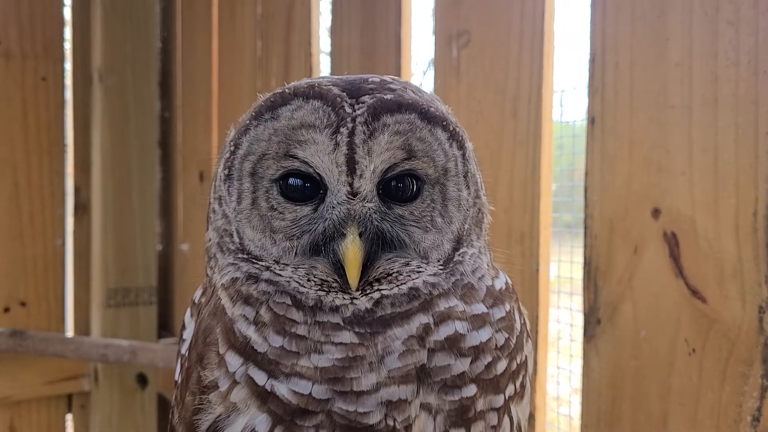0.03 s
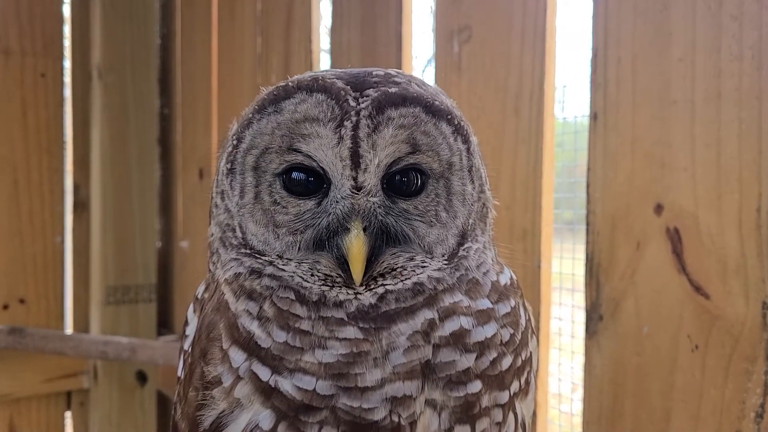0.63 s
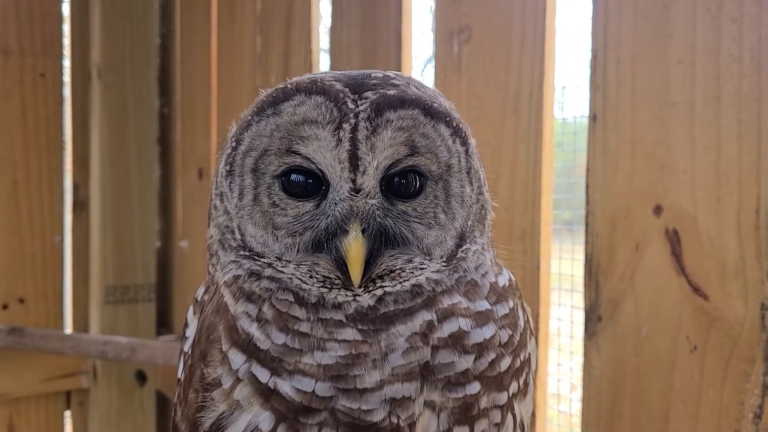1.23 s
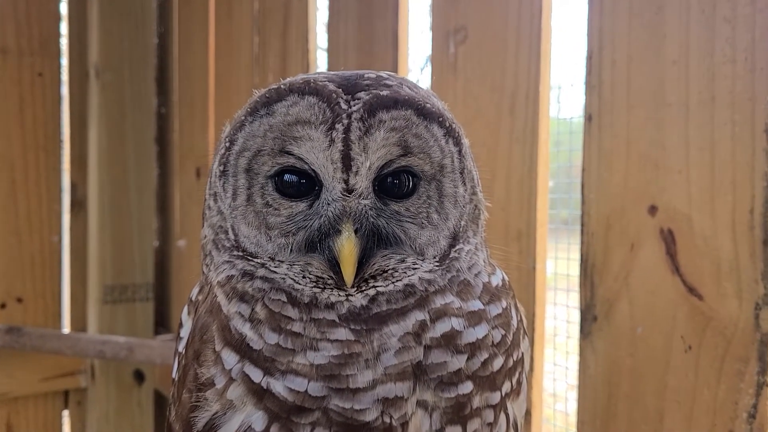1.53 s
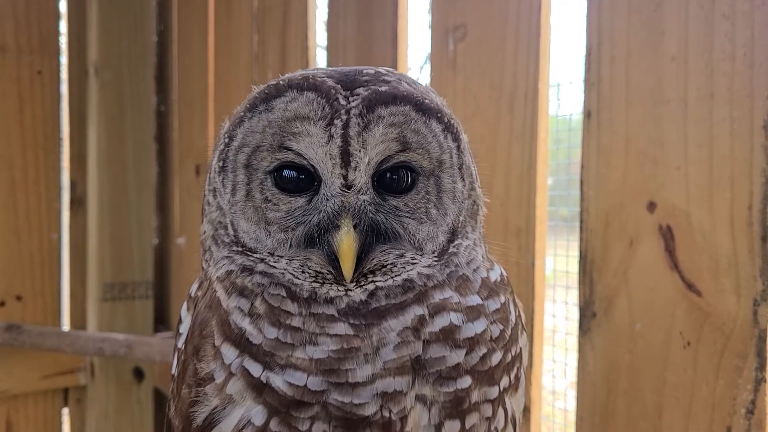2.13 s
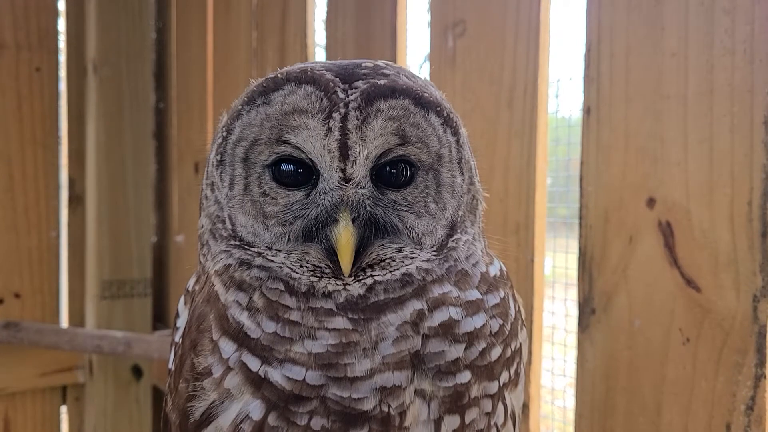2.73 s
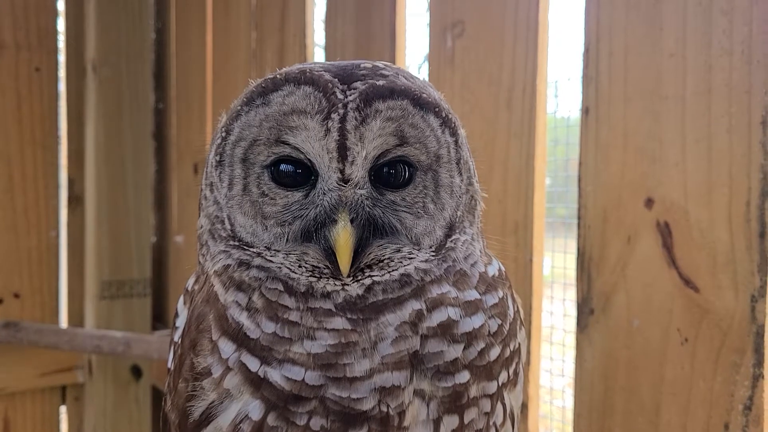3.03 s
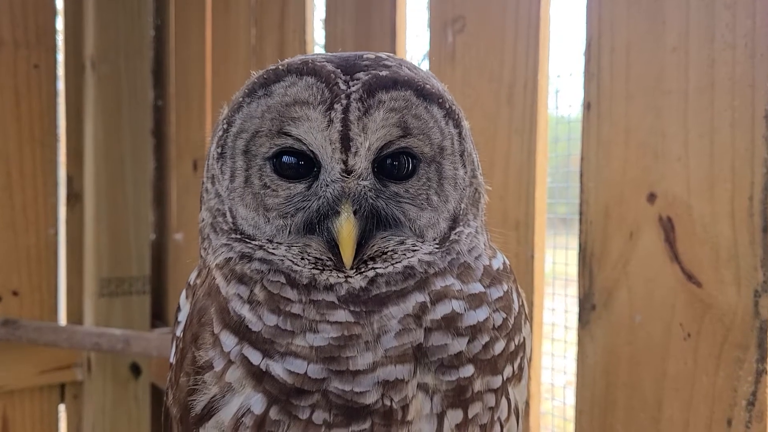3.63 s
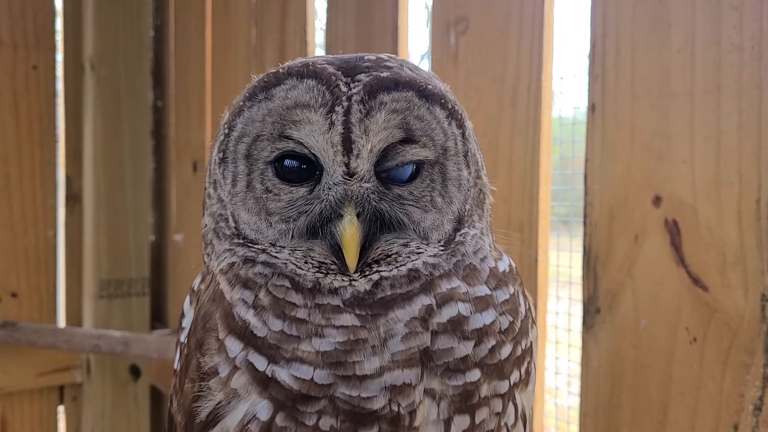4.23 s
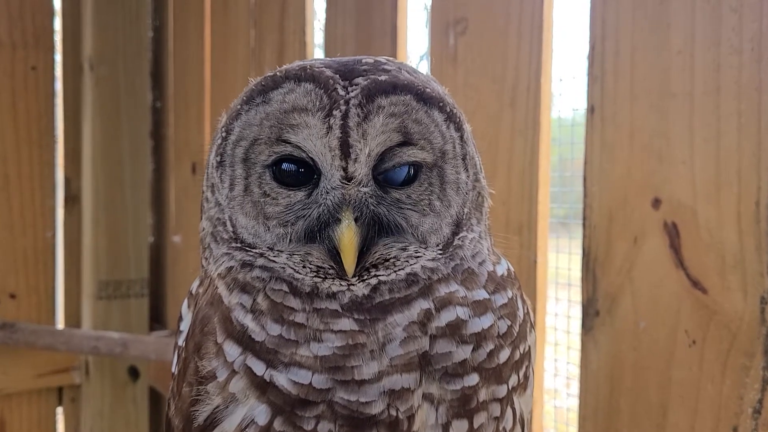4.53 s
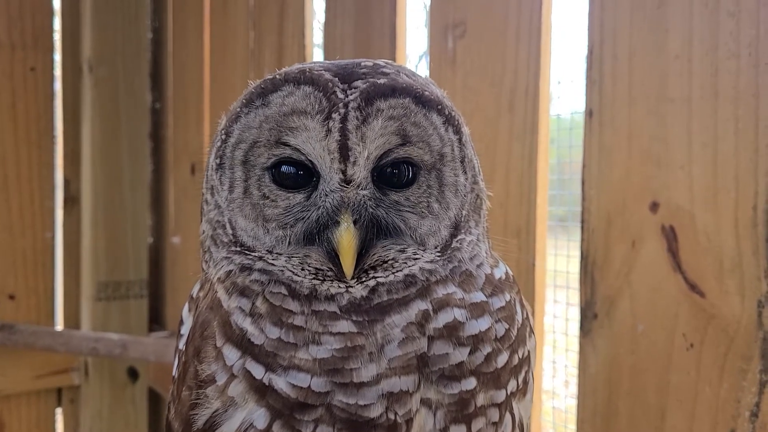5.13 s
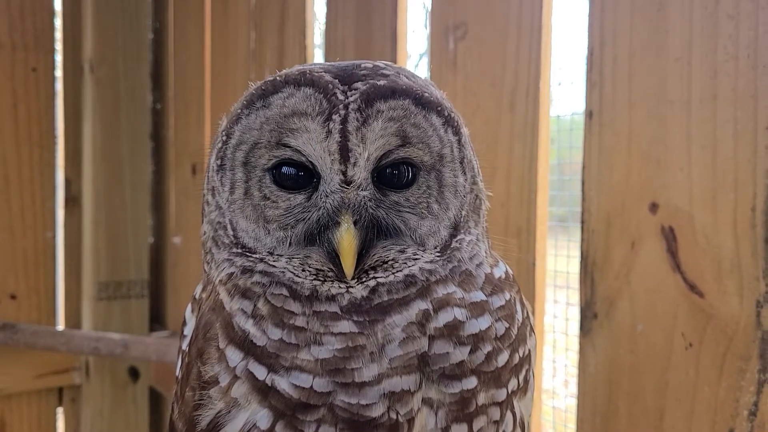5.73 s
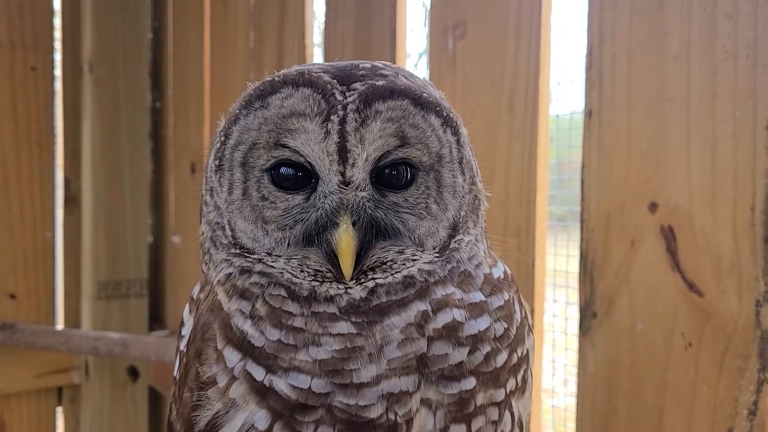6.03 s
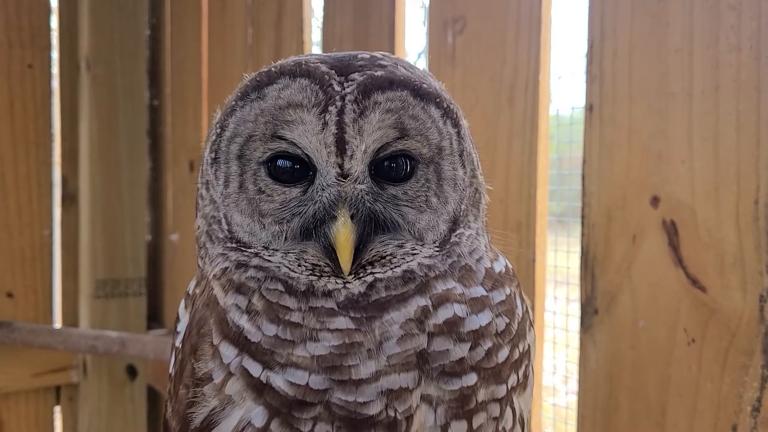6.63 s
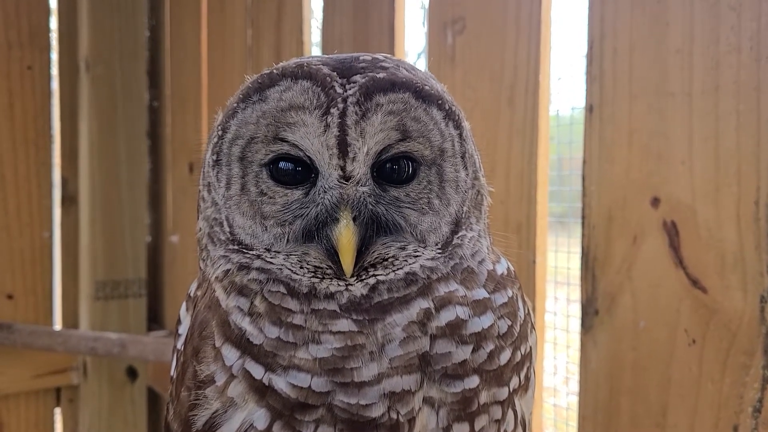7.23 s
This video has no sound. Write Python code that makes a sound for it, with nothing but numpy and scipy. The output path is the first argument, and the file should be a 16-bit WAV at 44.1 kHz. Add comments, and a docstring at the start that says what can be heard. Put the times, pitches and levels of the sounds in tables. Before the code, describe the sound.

A nearby owl makes a run of seven soft, very brief hoots, rising and then falling in pitch, inside a plank enclosure. Before them come a few light handling knocks on the microphone and a barely audible rooster in the distance. Occasional bumps continue during and after the hoots. Faint bird whistles and twittering come from outside, over a quiet, steady rumble of far traffic.

```python
"""An owl in a plank enclosure gives seven short, soft hoots that climb in pitch and sink again.
Its voice box makes a nearly pure tone with a thin buzz on top, and the boards add quick echoes.
A hand bumps, ticks and slips on a camera, mostly on the right. Small birds whistle and a rooster
crows far off, over the low rumble of distant traffic and a faint hiss."""
import sys
import numpy as np
from scipy import signal
from scipy.fft import rfft, irfft
from scipy.io import wavfile
from scipy.ndimage import map_coordinates

SR = 44100
rng = np.random.default_rng(int(sys.argv[2]) if len(sys.argv) > 2 else 0)


def master_out(mix):
    """Clip the mix to full scale and print it as 16-bit PCM to the path in sys.argv[1]."""
    frames = np.transpose(np.atleast_2d(mix))
    ceiling = np.clip(frames, -1, 1)
    pcm = np.round(ceiling * 32767).astype(np.int16)
    wavfile.write(sys.argv[1], SR, pcm)


N = 326340
TIME = np.arange(N) / SR
SIDES = np.array([[.5], [-.5]])   # splits a left-minus-right amount between the two sides


# The hoots, before their pitch sags: start_s, length_s, level_db, top_pitch_hz, top_time_s, end_pitch_hz
HOOTS = [(3.4508, 0.066, -32.5, 561.7, 0.029, 465.6), (3.746, 0.056, -31.5, 586, 0.02, 505),
         (4.0874, 0.06, -32, 626, .026, 490), (4.296, 0.067, -31.6, 690.4, 0.026, 514),
         (4.582, 0.059, -30.5, 707.7, 0.013, 493), (4.9477, 0.061, -31.5, 665.3, 0.018, 472),
         (5.48, 0.07, -32.5, 617.7, 0.029, 448)]
# How the throat colours the overtones (the tones above the main one): pitch_hz, gain_db
THROAT = [(1050, -19.5), (1400, -17), (1560, -36), (1800, -33.5), (2100, -57.5), (2800, -54), (3500, -36),
          (4200, -38.5), (4900, -31), (5600, -37), (6400, -50.5), (10000, -46), (11200, -60), (14000, -53),
          (16000, -68)]
# Which side the overtones lean to: pitch_hz, left_minus_right_db
OWL_BALANCE = [(600, -3.3), (1400, 1.3), (2500, -8), (3600, -18.5), (5000, -9.5), (6500, 4.5), (9000, 7),
               (14000, 9)]

def owl(jitter=.005, sag=.1, die_s=.0063, shimmer_db=3.5):
    """The voice box swings smoothly; it buzzes only while the breath pushes hardest."""
    out = np.zeros((2, N))
    for start, length, level_db, top_hz, top_s, end_hz in HOOTS:
        t, hz = arch(length, top_hz, top_s, end_hz, margin_s=.02)
        hz = hz * (1 - sag * (1 + np.tanh((t - length) / die_s)) / 2)   # pitch sags as the air runs out
        uneven_hz = hz * (1 + jitter * drift(300, len(t)))
        phase = 2 * np.pi * np.cumsum(uneven_hz) / SR
        pressure = swell(t, on_s=.0082, off_s=length - .0073, grow_s=.0045, die_s=die_s)
        buzz_db = -1.6 + 13 * np.log2(top_hz / 623)   # a higher hoot is pressed harder and buzzes more
        buzz = from_db(buzz_db) * swell(t, on_s=.012, off_s=length * .55, grow_s=.0062, die_s=.01)
        note = pressure * np.sin(phase) * np.ones((2, 1))
        for k in range(2, 26):
            strength = pressure ** 2 if k == 2 else buzz * from_db(shimmer_db * drift(80, len(t)))
            colour = from_db(at_hz(THROAT, k * hz) + SIDES * at_hz(OWL_BALANCE, k * hz))
            note += strength * colour * np.sin(k * phase)
        add(out, start + t[0], from_db(level_db) * note)
    return out


# Echoes from the boards, one table for each side: delay_ms, gain_db
LEFT_ECHOES = [(1.41, -11.5), (2.19, -20), (3.86, -17.5), (16.1, -20), (22.64, -15.5), (42.36, -23.5)]
RIGHT_ECHOES = [(2.43, -11.5), (7.1, -7.5), (11.56, -16), (17.53, -16), (29.7, -20.5), (38.44, -22)]

def enclosure(voice, tail_db=-24, absorb_hz=1100, right_lag_s=.00016):
    """A few hard echoes bounce off the planks, then a short tail leaks out through the gaps."""
    out = voice.copy()
    for side, echoes in enumerate((LEFT_ECHOES, RIGHT_ECHOES)):
        for delay_ms, gain_db in echoes:
            out[side] += from_db(gain_db) * np.roll(voice[side], round(delay_ms * SR / 1000))
    out[1] = np.roll(out[1], round(right_lag_s * SR))   # the right microphone is farther from the beak
    dull = filtered(voice, absorb_hz, "low", order=1)   # wood and litter soak up the overtones
    return out + from_db(tail_db) * scatter(dull, fade_s=.16, onset_s=.021)


# Touches on the camera body: time_s, level_db, ring_hz, half_width_s, thud_vs_ring_db
BUMPS = [(.161, -38, 330, 0.0016, -25), (0.5316, -52.5, 1000, 0.00029, -11),
         (0.9239, -41.5, 1100, .0002, -22), (0.9392, -33.5, 1150, 0.00086, -2.5),
         (.966, -44, 1280, 0.0002, -22), (0.9954, -45, 550, 0.00069, -20),
         (1.0643, -43.5, 5200, 0.00016, -40), (1.074, -51, 5370, .00015, -40),
         (1.105, -45, 4800, 0.00018, -40), (1.1395, -31, 500, 0.00033, -24),
         (2.356, -35.5, 1000, 0.001, -4), (3.862, -37.5, 320, 0.00066, -0.5),
         (3.8841, -44.5, 400, .0004, -6.5), (5.0586, -37, 700, 0.00052, -5.5),
         (7.0928, -34.5, 800, 0.00047, -19)]

def camera_bumps(thud_hz=270, thud_fade_s=.022, grit_db=-19, grit_fade_s=.068, left_db=-24):
    """Each touch rings for an instant, leaves a gritty edge and pushes the case into a low thud."""
    out = np.zeros(N)
    t = TIME[:SR // 16] - .006   # the touch lands at t = 0
    since_touch = np.maximum(t, 0)
    since_push = np.maximum(t - .0011, 0)   # the thud starts a moment later
    for time_s, level_db, ring_hz, width_s, thud_db in BUMPS:
        ring = 4 * swell(t, 0, 0, width_s, width_s) * np.cos(2 * np.pi * ring_hz * t)
        thud = from_db(thud_db - 60 * since_push / thud_fade_s) * np.sin(2 * np.pi * thud_hz * since_push)
        grit_gain = from_db(grit_db - 60 * since_touch / grit_fade_s) * (1 + np.tanh(t / width_s)) / 2
        grit = filtered(grit_gain * rng.standard_normal(len(t)), 2300, "low")
        add(out, time_s + t[0], from_db(level_db) * (ring + thud + grit))
    return filtered(out, 70, "high") * from_db([[left_db], [0]])


def finger_slip(start_s=3.874, length_s=.045, level_db=-70, grain_db=5, left_db=-8):
    """A fingertip slips briefly on the case: a clump of tiny grains of sound."""
    out, size = np.zeros(N), int(length_s * SR)
    grains = rng.standard_normal(size) * from_db(grain_db * drift(570, size))
    add(out, start_s, from_db(level_db) * rms_one(grains) * signal.windows.tukey(size, .5))
    return out * from_db([[left_db], [0]])


def chirp(length, start_hz, end_hz, warble):
    """One whistle bends away from its first pitch, with a fast wobble."""
    t, hz = arch(length, start_hz, 0, end_hz)
    hz = hz * (1 + warble * drift(450, len(t)))
    return signal.windows.tukey(len(t), .8) * np.sin(2 * np.pi * np.cumsum(hz) / SR)


def twitter(length, middle_hz, notes_per_s=36, note_s=.055, spread_octaves=.27, glide_octaves=.4):
    """A quick run of notes, each sliding up or down from a pitch of its own."""
    out = np.zeros(int((length + 2 * note_s) * SR))
    for k, (late, height, bend) in enumerate(rng.uniform(-.8, 1, (int(length * notes_per_s), 3))):
        start_hz = middle_hz * 2 ** (spread_octaves * height)
        end_hz = start_hz * 2 ** (glide_octaves * bend)
        add(out, (k + .5 + late / 2) / notes_per_s, chirp(note_s, start_hz, end_hz, warble=.05))
    return out


# Nearer bird calls, before distance softens them: start_s, length_s, level_db, start_hz, end_hz
CHIRPS = [(0.137, 0.039, -72, 6900, 8600), (0.835, 0.067, -65.5, 6900, 8100),
          (1.597, 0.016, -64, 10360, 8100), (1.613, 0.047, -55.5, 7660, 9040),
          (1.633, 0.067, -69, 3470, 4730), (1.716, 0.078, -73, 2880, 2480),
          (2.02, 0.075, -69.5, 2850, 3220), (2.115, 0.15, -72, 4200, 3830), (2.421, 0.11, -69, 2874, 2936),
          (3.3, 0.025, -66.5, 2500, 2450), (3.5, .1, -71.5, 1770, 1684), (3.661, 0.04, -71.5, 2700, 2620),
          (5.484, 0.073, -65.5, 3610, 4100), (6.338, .05, -65, 7900, 6750),
          (6.35, 0.056, -58.5, 3367, 3660), (6.754, 0.057, -75, 6800, 5240),
          (7.241, 0.074, -67.5, 5370, 6270), (7.309, .047, -64, 4710, 3280)]
# Bursts of twittering farther off: start_s, length_s, level_db, middle_pitch_hz
TWITTERS = [(1.407, .07, -77.5, 3430), (1.993, 0.27, -76, 3600), (2.55, 0.18, -81.5, 3595),
            (2.839, .22, -78.5, 3650), (3.28, 0.32, -77, 3690), (4.66, .12, -76.5, 3790),
            (5.161, .18, -80, 3016), (5.93, 0.11, -78, 3810), (6.197, 0.12, -76, 3910),
            (6.993, .2, -74, 3285)]

def small_birds(direct_db=-12.5, echo_db=-2, chorus_db=-86, chorus_start_s=1.3):
    """Nearer chirps stand out from far twittering and a faint chorus, which arrive only as echoes."""
    near, far = np.zeros(N), np.zeros(N)
    for start, length, level_db, start_hz, end_hz in CHIRPS:
        add(near, start, from_db(level_db) * chirp(length, start_hz, end_hz, warble=.024))
    for start, length, level_db, middle_hz in TWITTERS:
        add(far, start, from_db(level_db) * twitter(length, middle_hz))
    add(far, chorus_start_s, from_db(chorus_db) * twitter(length=4.4, middle_hz=3400))
    return from_db(direct_db) * near + scatter(from_db(echo_db) * near + far, fade_s=.2, onset_s=.0063)


# The parts of the crow, before distance softens them:
# start_s, length_s, level_db, turn_pitch_hz, turn_time_s, end_pitch_hz
CROW = [(2.015, .07, -78.5, 1568, 0.0372, 1556), (2.13, 0.057, -70.5, 1540, 0.039, 1550),
        (2.47, .81, -77, 1583, 0.22, 1456)]

def rooster(flutter_db=4.5, waver=.018, fade_db_per_hz=.0605, edge_s=.012, direct_db=-6, echo_db=-1):
    """Distance leaves one wavering tone of the crow: two short notes and a long, sinking one."""
    tone = np.zeros(N)
    for start, length, level_db, turn_hz, turn_s, end_hz in CROW:
        t, hz = arch(length, turn_hz, turn_s, end_hz, margin_s=.06)
        hz = hz * (1 + waver * drift(140, len(t)))
        drop_db = fade_db_per_hz * (turn_hz - hz)   # fainter as the pitch falls
        gain = from_db(level_db - drop_db + flutter_db * drift(25, len(t)))
        gain *= swell(t, 0, length, edge_s, edge_s)
        add(tone, start + t[0], gain * np.sin(2 * np.pi * np.cumsum(hz) / SR))
    return from_db(direct_db) * tone + from_db(echo_db) * scatter(tone, fade_s=.53, onset_s=.036)


# How alike the two sides of the background are (1 is the same, 0 unrelated): pitch_hz, likeness
LIKENESS = [(190, .94), (290, 0.58), (640, 0.29), (1410, -0.14), (3100, -0.02), (15000, -0.03)]
# Which side the background leans to: pitch_hz, left_minus_right_db
AIR_BALANCE = [(60, -1.5), (180, 0), (550, -3), (1650, -4.5), (4970, -6.5), (15000, 12)]

def air(colour):
    """Steady noise, alike on both sides in the bass and unrelated in the treble."""
    hz = np.maximum(np.fft.rfftfreq(N, 1 / SR), 1)
    shared, opposite = rfft(rng.standard_normal((2, N)))
    alike = at_hz(LIKENESS, hz)
    pair = np.sqrt(1 + alike) * shared + np.sqrt(1 - alike) * opposite * 2 * SIDES
    noise = irfft(pair * from_db(at_hz(colour, hz) + SIDES * at_hz(AIR_BALANCE, hz)), N)
    return noise / noise.mean(axis=0).std()


# The tone colour of the far traffic and of the outdoor hiss: pitch_hz, relative_db
RUMBLE = [(11, -46.5), (18, -6.5), (38, -2.5), (79, -2), (94, -8.5), (108, -17), (155, -21.5), (204, -29.5),
          (321, -29.5), (400, -37.5), (520, -55.5), (880, -120)]
HISS = [(240, -30), (400, 0.5), (595, -3), (928, -12), (1260, -11), (1740, -10), (2220, -16), (3110, -13),
        (6000, -22), (6890, -23), (7440, -23.5), (8400, -21), (10600, -27.5), (13500, -25.5), (15500, -28)]
# Thin, high bands in the hiss: pitch_hz, width_hz, level_db
WHINES = [(6856, 330, -89.5), (8300, 440, -97), (9820, 180, -99)]

def background(rumble_db=-55, swell_db=.5, hiss_db=-77):
    """Far traffic rumbles and gently swells under a faint hiss with a few thin whines."""
    rumble_gain = from_db(rumble_db + swell_db * drift(2.1, N))
    out = rumble_gain * air(RUMBLE) + from_db(hiss_db) * air(HISS)
    for hz, width_hz, level_db in WHINES:
        band = filtered(rng.standard_normal((2, N)), [hz - width_hz / 2, hz + width_hz / 2], "band")
        out += from_db(level_db) * rms_one(band)
    return out


def arch(length, turn_hz, turn_s, end_hz, margin_s=0):
    """Time and pitch along a curve that turns at turn_s, held steady for margin_s at each end."""
    t = np.arange(int((length + 2 * margin_s) * SR)) / SR - margin_s
    from_turn = (np.clip(t, 0, length) - turn_s) / (length - turn_s)
    return t, turn_hz + (end_hz - turn_hz) * from_turn ** 2


def swell(t, on_s, off_s, grow_s, die_s):
    """A vibration grows around on_s, levels off and dies away around off_s."""
    return (1 + np.tanh((t - on_s) / grow_s)) * (1 + np.tanh((off_s - t) / die_s)) / 4


def scatter(x, fade_s, onset_s):
    """Countless small echoes, different on each side, that fall by 60 dB in fade_s."""
    t = TIME[:SR // 2]
    tail = rng.standard_normal((2, len(t))) * from_db(-60 * t / fade_s) * np.minimum(t / onset_s, 1) ** 2
    tail /= np.sqrt(np.sum(tail ** 2, axis=1, keepdims=True))
    return signal.fftconvolve(np.atleast_2d(x), tail, axes=1)[:, :N]


def drift(rate, size):
    """A smooth random wobble that changes about `rate` times a second."""
    knots = np.arange(size) / SR * rate
    return map_coordinates(rng.standard_normal(4096), [knots], order=3, mode="wrap")


def from_db(db):
    """Turn decibels into a multiplier."""
    return 10 ** (np.asarray(db) / 20)


def rms_one(x):
    """Scale a sound to an average power of 1."""
    return x / np.sqrt(np.mean(x ** 2) + 1e-20)


def at_hz(points, hz):
    """Read a table at any pitch, blending between its rows."""
    table = np.array(points)
    return np.interp(np.log(hz), np.log(table[:, 0]), table[:, 1])


def filtered(x, hz, kind, order=2):
    """Keep the lows, the highs or one band of a sound."""
    return signal.sosfilt(signal.butter(order, hz, kind, fs=SR, output="sos"), x + 1e-18)


def add(track, start_s, sound):
    """Mix a sound in at start_s."""
    size = track.shape[-1]
    at = int(np.clip(start_s * SR, 0, size - 1))
    track[..., at:at + sound.shape[-1]] += sound[..., :size - at]


def scene():
    """The owl close by, the hand on the camera, and the outdoors behind the planks."""
    return enclosure(owl()) + camera_bumps() + finger_slip() + small_birds() + rooster() + background()


def record(dry, cutoff_hz=15750):
    """The very highest treble is cut off steeply."""
    return signal.sosfilt(signal.ellip(10, .1, 70, cutoff_hz, fs=SR, output="sos"), dry)


dry = scene()
out = record(dry)
master_out(out)
```